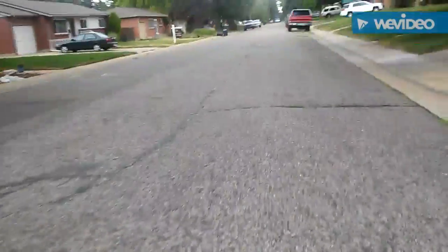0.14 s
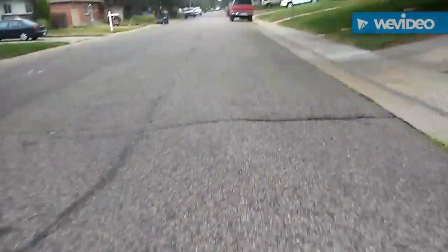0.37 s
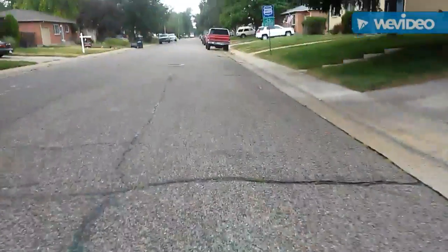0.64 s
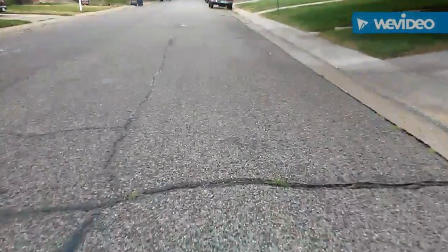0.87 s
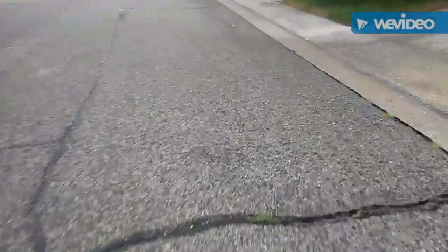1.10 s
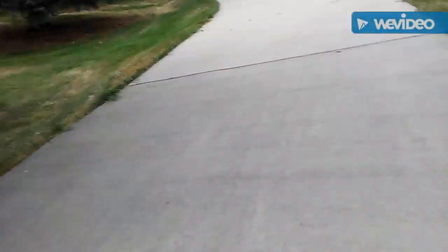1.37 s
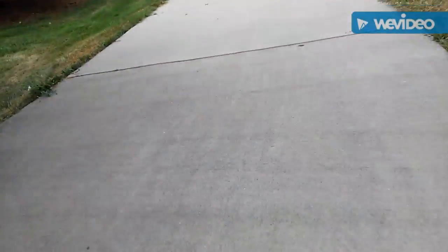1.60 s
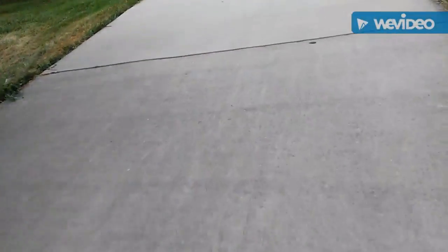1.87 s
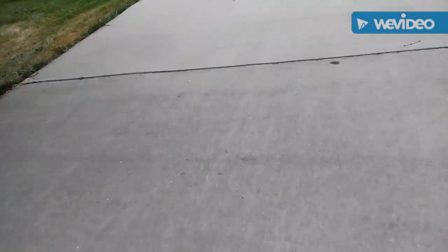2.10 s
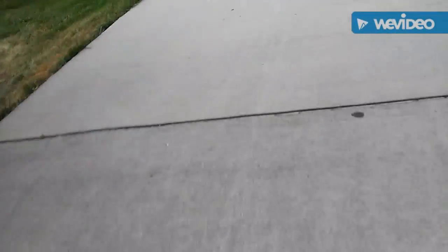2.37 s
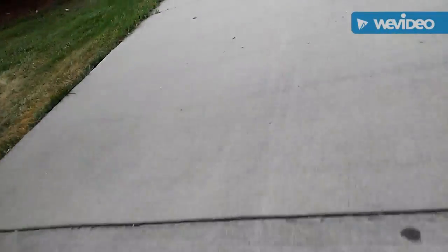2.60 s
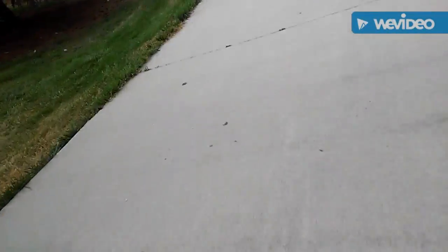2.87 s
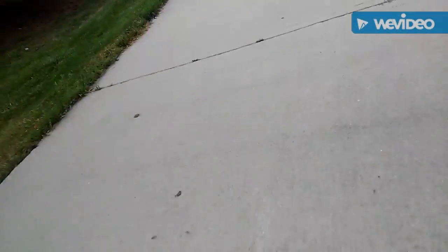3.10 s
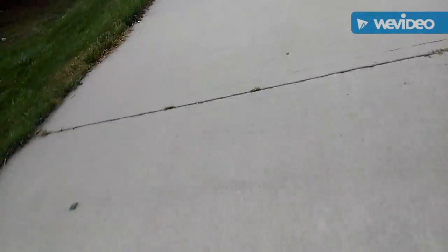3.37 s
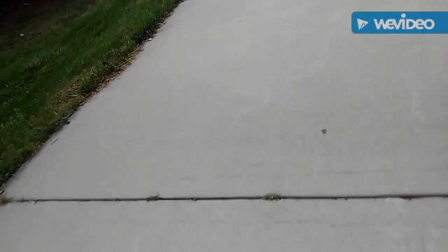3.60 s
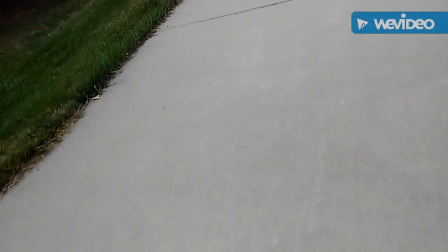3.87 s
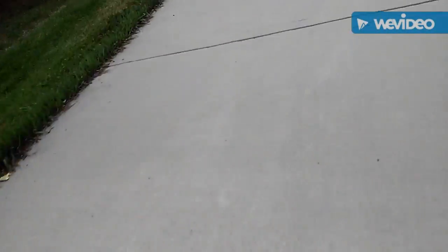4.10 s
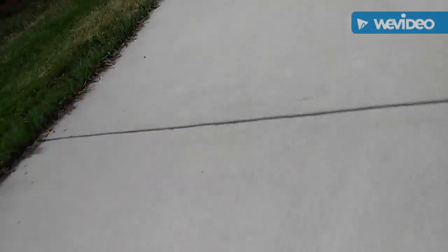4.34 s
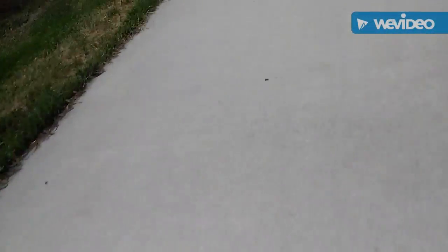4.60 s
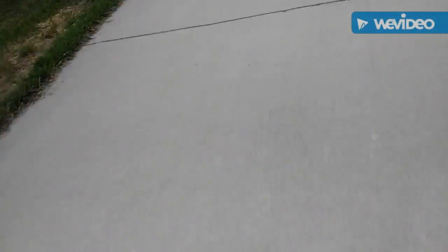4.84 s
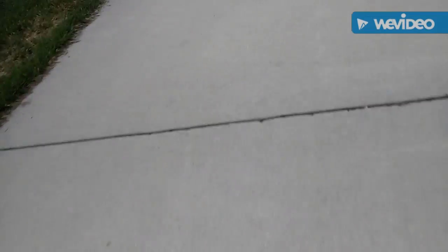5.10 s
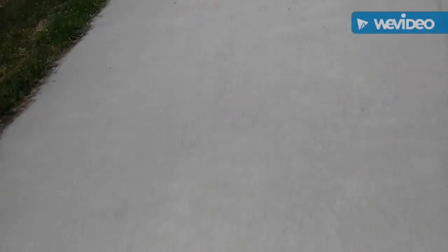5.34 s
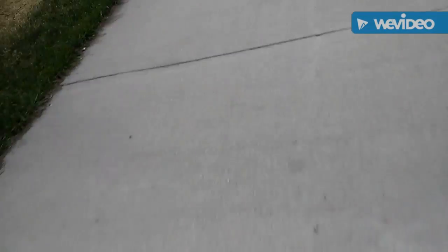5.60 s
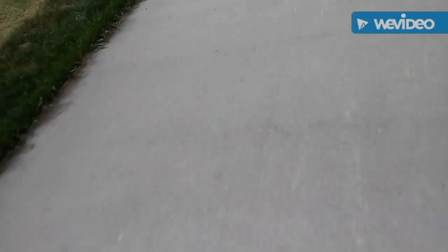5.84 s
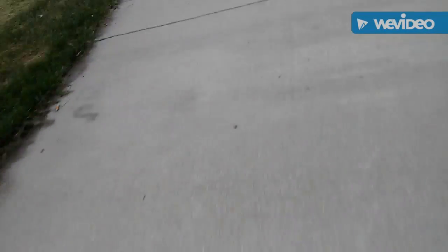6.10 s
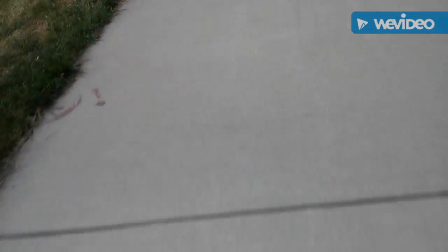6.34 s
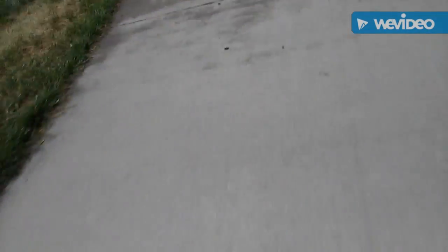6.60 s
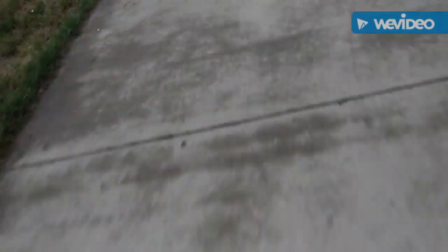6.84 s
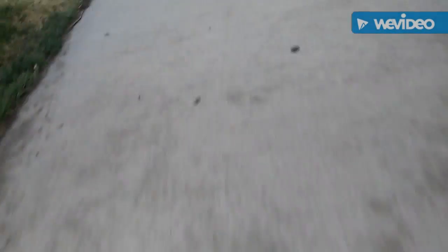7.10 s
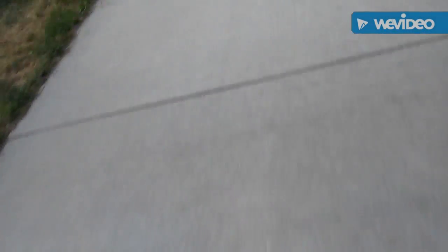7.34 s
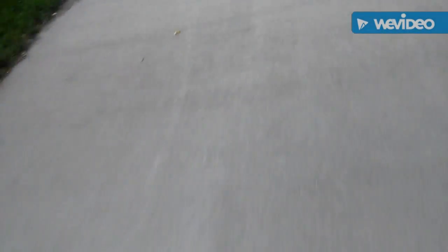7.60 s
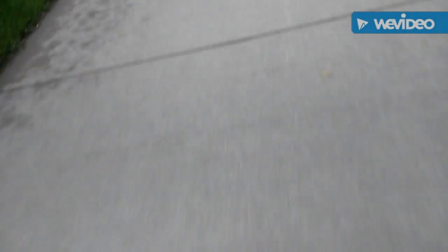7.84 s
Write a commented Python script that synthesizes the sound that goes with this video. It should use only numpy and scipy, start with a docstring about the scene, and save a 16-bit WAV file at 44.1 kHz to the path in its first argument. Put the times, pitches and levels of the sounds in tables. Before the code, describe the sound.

Close to a skateboard's deck outdoors, hard wheels drone and rattle loudly over coarse asphalt, with gritty hiss at the start. The sound stops dead for about half a second. It fades in again on smoother concrete, where a shoe scrapes in short pushes, trucks chatter, sand ticks and the wheels knock over slab joints as the roll grows louder. Mono, slightly overloaded.

```python
"""A skateboard ride outdoors, heard in mono from a microphone close to the deck, in two shots.
First hard wheels drone and rattle over coarse asphalt, loose grit hissing at the start; a dead cut leaves silence.
Then, fading in, a foot scrapes and pushes the board up to speed on a concrete path, trucks chattering and sand ticking.
Wheels knock, front axle then rear, over the slab joints. Road and sole are coloured random bumps, trucks and deck
are struck resonances, and each knock adds a decaying note. The input clips on the loudest swings."""
import sys
import numpy as np
from scipy import signal
from scipy.fft import rfft, irfft, next_fast_len
from scipy.io import wavfile
from scipy.ndimage import uniform_filter1d, map_coordinates

SR = 44100
rng = np.random.default_rng(int(sys.argv[2]) if len(sys.argv) > 2 else 0)


def elevation(decibels):
    """Turn decibel levels (scalar or array-like) into linear amplitude ratios."""
    levels = np.asarray(decibels, float)
    return 10 ** (levels / 20)


def to_wav(sig):
    """Store sig (one row per channel, or 1-D mono) as 16-bit WAV at the path in sys.argv[1].

    Samples outside -1..1 are clipped; the rate is SR.
    """
    pcm = np.clip(np.atleast_2d(sig), -1, 1) * 32767
    pcm = np.round(pcm).astype(np.int16)
    wavfile.write(sys.argv[1], SR, pcm.T)  # frames by channels


N = 351036

# short knocks and ticks: wheels striking cracks, joints and pebbles, and catches of the scraping shoe:
# start_s [s], crack_db [dB, before its colour and gain], knock_db [dB, 7 above the first blow's peak],
# pitch_hz [Hz], note_db [dB, before its rise and doubling]
KNOCKS = [(0.146, -37, -20, 6180, -27.5), (0.31, -49.5, -14, 611, -10), (0.4, -54.5, -21, 620, -7),
          (0.479, -34, -20, 6240, -24), (0.605, -55, -14, 623, -22), (0.866, -58, -10, 625, -17.5),
          (0.89, -57.5, -22, 576, -4.5), (0.955, -56, -9, 605, -10), (0.935, -60, -14, 629, -17),
          (0.994, -59, -15, 636, -15), (1.019, -58.5, -24, 609, -10), (1.062, -56.5, -21, 632, -14),
          (1.29, -54.5, -7, 553, -13), (2.05, -17.5, 11.5, 1070, -4.5), (2.056, -28, -16, 1625, -24),
          (2.46, -39, -26, 6300, -42), (2.573, -33, -29, 6260, -34), (2.586, -38, -29, 6260, -29),
          (2.76, -40.5, -29, 6200, -27), (2.928, -30.5, -37, 1813, -27.5), (3.050, -28, -17, 621, -9),
          (3.056, -26, -20, 2320, -19), (3.130, -38, -15, 1550, -30), (3.128, -50, -20, 303, -14.5),
          (3.146, -33.5, -19, 3080, -26), (3.16, -23, 0.5, 325, -10), (3.362, -34.5, -13, 4300, -44),
          (3.612, -43, -25, 624, -9), (3.651, -30, -15, 1232, -28.5), (3.685, -40, -21, 2050, -27),
          (3.761, -26, -23, 4520, -29), (3.766, -28.5, -22, 2270, -21.5), (3.768, -34.5, -20, 587, -10),
          (3.788, -50.5, -30, 92, -13.5), (3.91, -43, -27, 323, -10.5), (3.836, -41.5, -27, 5260, -32),
          (3.943, -28, -12, 567, -12), (3.972, -23, -2, 595, -11.5), (4.003, -38.5, -5, 1004, -35),
          (4.046, -43, -31, 5170, -42), (4.073, -29.5, -3.5, 1154, -17), (4.104, -31.5, -9, 396.5, -6.5),
          (4.107, -23.5, 1.5, 1020, -14), (4.132, -30.5, -26, 3280, -28), (4.172, -33.5, -29, 3360, -34),
          (4.222, -31.5, -11, 3370, -27), (4.288, -45, -14.5, 536, -11), (4.331, -29, -11, 3350, -39),
          (4.346, -32, -12, 4800, -31), (4.458, -31, -3.5, 1800, -35), (4.614, -29.5, -11, 2980, -23),
          (4.646, -27, -12, 2360, -28), (4.667, -28, -15, 1750, -27), (4.732, -26, -7, 627, -10),
          (4.742, -23.5, 0.5, 1806, -23), (4.857, -23, 2, 2930, -18), (5.152, -35, -20, 8360, -42),
          (5.421, -20, -12, 581.5, 0.5), (5.469, -46.5, -15.5, 620, -9), (5.516, -25.5, 1.5, 1564, -18),
          (6.014, -25, -3, 616, -3.5), (6.101, -20, 1, 1820, -15), (6.594, -19.5, -19, 608, 0.5),
          (6.677, -21, 0, 649, 1.5), (7.128, -24, -4.5, 1800, -18), (7.196, -38, -15, 2410, -30),
          (7.21, -21.5, 5, 646, -3), (7.689, -18, -4, 565, -4.5), (7.75, -38, -13, 1810, -27),
          (7.767, -21.5, 5.5, 1510, -31.5)]
# what the struck deck rings with: mode_hz [Hz], width_hz [Hz], level_db [dB, relative]
DECK = [(337.6, 77, 4), (626.4, 83, 5.5), (1106, 100, 4.5)]
# what the trucks ring with: mode_hz [Hz], width_hz [Hz], level_db [dB, relative, per pass]
TRUCKS = [(1802, 110, 5), (2313, 280, 3), (2910, 300, 0), (4300, 450, 3), (8900, 1900, -2)]


def unit(x):
    """x scaled to an rms of one."""
    return x / np.sqrt(np.mean(x ** 2) + 1e-20)


def curves(rows):
    """One value per sample for each column after the time."""
    s, *columns = np.transpose(rows)
    return [np.interp(np.arange(N) / SR, s, column) for column in columns]


def wobble(rate):
    """A smooth random curve, rate knots a second (at most 200)."""
    knots = rng.standard_normal(int(N * 200 / SR) + 4)
    return map_coordinates(knots, [np.arange(N) * min(rate, 200) / SR])


def coloured(x, spectrum):
    """x through a causal, minimum-phase filter with the (Hz, dB) shape, floored at -90 dB."""
    m = 2 * next_fast_len(N // 2 + 4096)
    hz, db = np.transpose(spectrum)
    log_hz = np.log(np.fft.rfftfreq(m, 1 / SR) + 1)
    shape_db = np.interp(log_hz, np.log(hz + 1), np.maximum(db, -90))
    cepstrum = irfft(np.log(elevation(shape_db)), m)
    # folding the cepstrum onto positive time makes the filter causal
    cepstrum[1:m // 2] *= 2
    cepstrum[m // 2 + 1:] = 0
    return irfft(rfft(x, m) * np.exp(rfft(cepstrum)), m)[:N]


def ringing(x, modes):
    """x struck into (Hz, width, dB) resonances of alternating sign."""
    m = next_fast_len(N + 8192)
    f = np.fft.rfftfreq(m, 1 / SR)
    body = 0
    for k, (centre, width, db) in enumerate(modes):
        damping = 1j * f * width
        body = body + (-1) ** k * elevation(db) * damping / (centre * centre - f * f + damping)
    return irfft(rfft(x, m) * body, m)[:N]


def texture(per_s, scatter_db, smooth):
    """A rough surface: bumps of unequal size at random moments, over a smooth rub."""
    chance, size = rng.random(N), rng.exponential(size=N)
    sign = np.sign(rng.standard_normal(N))
    bumps = (chance < per_s / SR) * elevation(scatter_db * np.minimum(size, 3)) * sign
    return unit(bumps) + smooth * rng.standard_normal(N)


def layer(level_db, road, spectrum, shake_db):
    """One coloured answer to the surface, its level shaken at random."""
    return elevation(level_db) * unit(coloured(road * elevation(shake_db), spectrum))


def patchy(x, depth_db):
    """The colour drifts: random gain in patches about 700 Hz wide and 60 ms long."""
    z = signal.stft(x, nperseg=512)[2]
    field = uniform_filter1d(rng.standard_normal(z.shape), size=8, axis=0)
    field = uniform_filter1d(field, size=10, axis=1)
    gain_db = depth_db * unit(field) - .115 * depth_db ** 2  # the last term keeps the mean power
    return signal.istft(z * elevation(gain_db), nperseg=512)[1][:N]


def lulls():
    """Loss of drone in dB, mostly as the rider's weight shifts off the deck."""
    # momentary drops: start_s [s], length_s [s], depth_db [dB]
    drops = [(2.658, 0.05, 3.5), (2.936, 0.1, 7.5), (2.989, 0.075, 3.5), (3.171, 0.043, 2.5),
             (3.625, 0.075, 6.5), (3.699, 0.058, 11.5), (4.021, 0.13, 2.5), (4.668, 0.063, 6.5),
             (4.759, 0.056, 4.5), (5.851, 0.048, 3)]
    lift_s = 0.011
    t = np.arange(N) / SR
    loss_db = np.zeros(N)
    for s, length, db in drops:
        loss_db += np.interp(t, [s, s + lift_s, s + length, s + length + lift_s / 2], [0, db, db, 0])
    return loss_db


def hops():
    """Loss of road sound in dB after each knock, larger for harder ones, as when a wheel hops."""
    settle_s, settle_db, hard_db = 0.061, 1, -12.5  # time of greatest loss; that loss for a crack_db of hard_db
    kicks = np.zeros(N)
    for s, crack_db, *_ in KNOCKS:
        kicks[round(s * SR)] = settle_db * elevation(crack_db - hard_db)
    t = np.arange(SR // 2) / SR / settle_s
    return signal.fftconvolve(kicks, t * np.exp(1 - t))[:N]


def specks():
    """Grains of sand crack under the wheels: faint, frequent bright ticks of decaying noise."""
    # sand ticks: freq_hz [Hz], level_db [dB per Hz, relative]
    tick_colour = [(2500, -30), (3300, -9.5), (4700, -3.5), (6300, -2.5), (7600, -7.5), (9200, -3),
                   (12000, -15.5), (15800, -29.5)]
    t = np.arange(SR // 100) / SR
    grains = np.abs(texture(per_s=130, scatter_db=3.2, smooth=0))
    puffs = signal.fftconvolve(grains, elevation(-60 * t / 0.008))[:N]  # 60 dB down in 8 ms
    return layer(-55 - lulls(), puffs * rng.standard_normal(N), tick_colour, 0)


def sole():
    """The shoe drags gritty over the concrete, swelling over the first half of each scrape, then holding until it stops."""
    # scrapes: start_s [s], end_s [s], peak_db [dB, before the grit's flutter]
    scrapes = [(2.813, 3.041, -51.5), (3.557, 3.754, -43.5), (4.543, 4.68, -43.5), (4.93, 5.093, -74)]
    # scraping sole: freq_hz [Hz], level_db [dB per Hz, relative]
    scrape_colour = [(760, -32.5), (1200, -3), (1500, -3), (2200, 3.5), (2650, -1), (3100, -8), (3800, -3),
                     (4460, -8.5), (6980, -21.5), (8860, -7.5), (14000, -35)]
    swell_db, swell_share, release_s = 10.5, 0.52, 0.011  # rise, share of the scrape spent rising, fall time
    t = np.arange(N) / SR
    stroke = np.zeros(N)
    for s, end, db in scrapes:
        times = [s - .1, s, s + swell_share * (end - s), end, end + release_s]
        stroke += elevation(np.interp(t, times, [db - 47, db - swell_db, db, db, db - 42.0]))
    grit = texture(per_s=900, scatter_db=8, smooth=1.3)
    return stroke * layer(0, grit, scrape_colour, 2.5 * wobble(50))


def trucks():
    """The trucks ring breathily and tick higher, in changing amounts through the ride."""
    # chattering trucks: time_s [s], breathy_db [dB], ticking_db [dB]
    chattering = [(2.15, -53, -44), (2.35, -68, -51), (2.55, -47.5, -49), (2.7, -64, -63), (2.77, -61, -45),
                  (2.86, -46, -54), (3.0, -48.5, -59), (3.2, -60, -80), (3.42, -55.5, -67), (3.5, -60, -44),
                  (3.61, -46.5, -59), (3.65, -47, -65), (3.74, -47, -56), (3.8, -55, -70), (3.86, -67, -53),
                  (3.93, -61, -43), (4.1, -69, -77), (4.19, -56, -43), (4.26, -54, -47), (4.4, -70, -46),
                  (4.5, -67, -51), (4.6, -44, -40.5), (4.75, -55, -57), (4.85, -47, -51),
                  (4.98, -63.5, -48.5), (5.1, -55.5, -46), (5.45, -64, -57), (5.62, -44, -63),
                  (5.85, -50, -66), (6.0, -50, -51), (6.5, -60, -65), (7.0, -62, -57), (7.3, -64, -54),
                  (7.6, -65.5, -43), (7.96, -65.5, -51.5)]
    # ring of the higher ticks: mode_hz [Hz], width_hz [Hz], level_db [dB, relative, per pass]
    tick_modes = [(3260, 380, 10.5), (4800, 760, 10.5), (6500, 720, 7.5), (8550, 1000, 3.5),
                  (12100, 800, -0.5)]
    breathy_db, ticking_db = curves([(1.9, -80, -80)] + chattering)
    shaking = texture(per_s=300, scatter_db=4.0, smooth=2.5) * elevation(3.5 * wobble(60))
    # ticks merge as speed grows
    blur = np.interp(np.arange(N) / SR, [3.2, 3.45, 4.5, 5.5], [1, 2, 2, 4])
    ticks = texture(per_s=110, scatter_db=4.5, smooth=blur) * elevation(2 * wobble(30))
    # two passes sharpen the resonances
    breathy = unit(ringing(ringing(shaking, TRUCKS), TRUCKS))
    ticking = unit(ringing(ringing(ticks, tick_modes), tick_modes))
    return elevation(breathy_db) * patchy(breathy, depth_db=1.0) + elevation(ticking_db) * patchy(ticking, depth_db=1.5)


def asphalt():
    """Coarse stones shake the deck, ring its main mode in bursts and rattle the trucks; loose grit hisses at first."""
    # wheels on asphalt: time_s [s], drone_db [dB], rattle_db [dB], hiss_db [dB]
    ride = [(0.0, -13, -38, -47), (0.062, -18.5, -37, -45), (0.1, -18.5, -32, -39), (0.15, -16, -30, -31),
            (0.27, -16.5, -33.5, -31.5), (0.3, -17.5, -35, -37.5), (0.43, -19, -34.5, -38),
            (0.46, -16, -30.5, -35), (0.54, -20.5, -29, -33.5), (0.624, -20, -33, -52),
            (0.716, -17, -28.5, -54), (0.83, -21.5, -31.5, -58.5), (0.89, -20, -29.5, -58),
            (1.024, -22, -34.5, -57), (1.194, -21.5, -30, -58), (1.32, -18, -27, -63.5)]
    # highest treble, strongest as the ride begins: time_s [s], level_db [dB]
    sizzle = [(0, -57), (0.058, -53), (0.072, -46), (0.1, -63), (0.29, -64), (0.33, -70.5), (0.55, -72),
              (0.62, -87.5), (1.4, -87)]
    # colours of deck drone, stone rattle, gritty hiss, highest treble: freq_hz [Hz], level_db [dB per Hz, relative]
    drone_colour = [(24, -55.5), (40, -13), (60, -16.5), (92, -16.5), (188, -5.5), (307, -2), (396, -4),
                    (488, -4), (619, 5), (740, -19), (851, -21.5), (967, -16), (1290, -24), (1800, -35),
                    (2340, -46.5), (3960, -120)]
    rattle_colour = [(760, -26), (1100, -4), (1550, -3), (2110, -7.5), (2380, 4), (2750, 2.5), (3150, -2.5),
                     (3700, -8), (4150, 1), (4600, 2), (5000, -2.5), (5490, -16.5), (6260, -22),
                     (7000, -49), (8510, -44), (12000, -56), (15600, -88), (22000, -120)]
    hiss_colour = [(2650, -47), (4500, -17.5), (4790, -12), (5350, -1.5), (6330, 1.5), (6960, -7),
                   (9590, -14), (11300, -29.5), (14300, -37), (15800, -52)]
    sizzle_colour = [(7000, -41.5), (9500, 6.5), (12000, 0.5), (15000, -3.5), (15800, -10)]
    drone_db, rattle_db, hiss_db = curves(ride)
    sizzle_db, = curves(sizzle)
    stones = texture(per_s=1200, scatter_db=8.0, smooth=1.35)
    chips = texture(per_s=1000, scatter_db=3.5, smooth=.9)
    grit = texture(per_s=980, scatter_db=7.5, smooth=0.99)
    bounce, chatter = .8 * wobble(45), wobble(120)
    drone = layer(0, stones, drone_colour, bounce + .8 * wobble(75))
    main_mode = DECK[1:2]
    ring = unit(ringing(ringing(stones * elevation(3.2 * wobble(60)), main_mode), main_mode))
    deck = elevation(drone_db) * unit(drone + elevation(0.5) * ring)
    rattle = patchy(layer(rattle_db, chips, rattle_colour, bounce + 1.3 * chatter), depth_db=1.2)
    treble = layer(sizzle_db, chips, sizzle_colour, chatter)
    hiss = layer(hiss_db, grit, hiss_colour, bounce + 1.9 * chatter)
    return deck + rattle + treble + hiss


def concrete():
    """The finer surface drones in the deck, rumbles through the board and hisses in the bearings."""
    # wheels on concrete, louder with speed: time_s [s], drone_db [dB], hiss_db [dB], before lulls and hops
    ride = [(2.15, -19, -53.5), (2.23, -17.5, -53.5), (2.46, -23.5, -62.5), (2.75, -24.5, -57),
            (2.9, -22.5, -57.5), (2.99, -25.5, -59), (3.14, -24, -53), (3.22, -25, -65),
            (3.36, -20.5, -54.5), (3.46, -25, -58), (3.61, -20, -53.5), (3.77, -22, -52), (3.99, -24, -58),
            (4.24, -20.5, -50), (4.5, -19.5, -52), (4.8, -19.5, -55.5), (5.08, -18, -51),
            (5.95, -17, -52.5), (6.4, -15.5, -50), (6.74, -15.5, -50.5), (7.15, -15.5, -51),
            (7.68, -15.5, -47.5), (7.96, -17, -48.5)]
    # low rumble through the board: time_s [s], level_db [dB], before lulls
    rumbling = [(2.15, -23), (2.57, -26), (2.59, -28), (2.76, -28), (2.8, -35), (2.89, -24), (2.96, -31.5),
                (3.14, -23.5), (3.2, -35), (3.31, -24), (3.77, -33), (3.8, -31), (3.83, -33), (3.93, -32),
                (3.99, -50), (4.03, -30.5), (4.12, -51), (4.16, -24.5), (4.33, -34.5), (4.4, -23),
                (4.45, -35.5), (4.56, -21.5), (4.96, -30.5), (5.32, -24.5), (5.43, -26), (5.48, -24),
                (5.61, -33.5), (5.66, -21.5), (7.76, -24.5), (7.96, -23)]
    # colours of deck drone, rumble, grit, fine hiss: freq_hz [Hz], level_db [dB per Hz, relative]
    drone_colour = [(76, -34), (130, -4), (275, -0.5), (297, -4), (331, -4), (369, -1.5), (500, 3),
                    (655, -5.5), (730, -5), (790, -8), (972, -20.5), (1100, -20.5), (1510, -23),
                    (1800, -28.5), (2340, -52), (3960, -120)]
    rumble_colour = [(13, -34), (22, -23.5), (45, -13.5), (65, -0.5), (220, -14), (290, -31), (480, -120)]
    grit_colour = [(590, -22), (850, 0.5), (1050, -0.5), (1200, -2.5), (1370, -12.5), (1800, -11.5),
                   (2300, -12), (2700, -14.5), (3300, -16), (3900, -21), (4700, -20.5), (5700, -26),
                   (7500, -57), (9750, -57), (16500, -120)]
    hiss_colour = [(3530, -23), (6000, -1), (7560, -5), (9220, -1.5), (11300, -11), (12200, -13),
                   (13300, -13.5), (15000, -14), (15800, -15.5)]
    cruise_db, grit_under_db, grit_grows = -25, 21, 1.345  # grit under a cruising drone; its dB per dB of drone
    lull_share = 0.37  # share of a lull heard in the treble
    drone_db, hiss_db = curves(ride)
    rumble_db, = curves(rumbling)
    lull_db, hop_db = lulls(), hops()
    grit_db = cruise_db - grit_under_db + grit_grows * (drone_db - cruise_db) - lull_share * lull_db
    sand = texture(per_s=500, scatter_db=3, smooth=2.2)
    stones = texture(per_s=700, scatter_db=2, smooth=2.2)
    bounce, chatter, sway = 1.2 * wobble(35), wobble(70), wobble(12)
    drone = layer(0, stones, drone_colour, 0.8 * bounce + 1.1 * sway)
    main_mode = DECK[1:2]
    hollow = unit(ringing(ringing(stones * elevation(1.2 * wobble(30)), main_mode), main_mode))
    # all deck modes, then the main mode alone, join the broad drone
    drone = unit(drone + elevation(-5.5) * unit(ringing(drone, DECK)) + elevation(-3) * hollow)
    deck = elevation(drone_db - lull_db - .5 * hop_db) * drone
    rumble = layer(rumble_db - 0.2 * lull_db, rng.standard_normal(N), rumble_colour, 1.5 * wobble(24))
    grit = layer(grit_db - hop_db, sand, grit_colour, bounce + 0.56 * chatter + 0.69 * sway)
    hiss_db = hiss_db - lull_share * lull_db - hop_db
    hiss = layer(hiss_db, sand, hiss_colour, bounce + 0.76 * chatter + 1.1 * sway)
    return deck + rumble + patchy(grit, depth_db=1.5) + patchy(hiss, depth_db=1.5)


def knocks():
    """Each knock or tick: a short rattling crack that rings the trucks, a blow that rings the deck, and one note."""
    # rattling crack: freq_hz [Hz], gain_db [dB, before 10 more]
    crack_colour = [(400, -31.5), (1000, 16.5), (1800, -8), (2400, -5.5), (3800, -6), (5100, -5),
                    (7800, -15), (8900, -15.5), (12500, -20), (15500, -21.5)]
    wheel_lag_s, second_wheel_db = 0.003244, -2  # an axle's second wheel strikes later and softer
    t = np.arange(SR // 20) / SR
    cracks, notes, blows = np.zeros(N + SR), np.zeros(N + SR), np.zeros(N)
    for s, crack_db, knock_db, hz, note_db in KNOCKS:
        jolt = rng.standard_normal(len(t))
        start = round(s * SR)
        # noise, 60 dB down in 27 ms
        cracks[start:][:len(t)] += elevation(crack_db - 60 * t / 0.027) * (1 - np.exp(-t / 0.0016)) * jolt
        t60 = 0.025 * np.sqrt(1000 / hz)  # 25 ms at 1 kHz, shorter for higher notes
        envelope = elevation(note_db - 60 * t / t60) * (1 - np.exp(-t / 0.0023))
        wander = 0.064 * np.cumsum(jolt) / np.sqrt(len(t))  # phase drift in cycles
        notes[start:][:len(t)] += envelope * 2 * np.sin(2 * np.pi * (hz * t + wander))
        second = round((s + wheel_lag_s) * SR)
        blows[[start, second]] = elevation(knock_db - 7.0 + np.array([0, second_wheel_db]))
    soft = uniform_filter1d(blows, size=25)  # a urethane wheel spreads the blow over half a millisecond
    reach = np.abs(ringing(np.arange(N) < 25, DECK)).max() / 25  # deck's peak answer to one such blow
    crack = elevation(10.0) * coloured(cracks[:N], crack_colour)
    return crack + elevation(5.5) * ringing(crack, TRUCKS) + ringing(soft, DECK) / reach + notes[:N]


def scene():
    """Asphalt in the first shot, concrete in the second, knocks in both."""
    first = np.arange(N) / SR < 1.6  # the change falls in the silence between the shots
    second_shot = concrete() + trucks() + sole() + specks()
    return (np.where(first, asphalt(), second_shot) + knocks())[None]


def top_cut(x):
    """Nothing passes above the cut-off."""
    return signal.sosfilt(signal.butter(12, 15830, fs=SR, output="sos"), x)


def record(dry):
    """The input clips softly; the edit cuts the first shot dead and fades the second in."""
    cut_s, fade_start_s, fade_end_s = 1.3295, 1.862, 2.463
    t = np.arange(N) / SR
    top = .35  # clipping level, full scale = 1
    hard = np.where(t < fade_start_s, 4.5, 7.)  # rounder knee in the first shot
    clipped = dry / (1 + np.abs(dry / top) ** hard) ** (1 / hard)
    first = np.clip((cut_s - t) / 0.00027, 0, 1)
    second = np.clip((t - fade_start_s) / (fade_end_s - fade_start_s), 0, 1)
    second = second * (t > fade_start_s + .004)  # the fade's first 4 ms stay silent
    return top_cut(clipped * (first + second))


dry = scene()
out = record(dry)
to_wav(out)
```